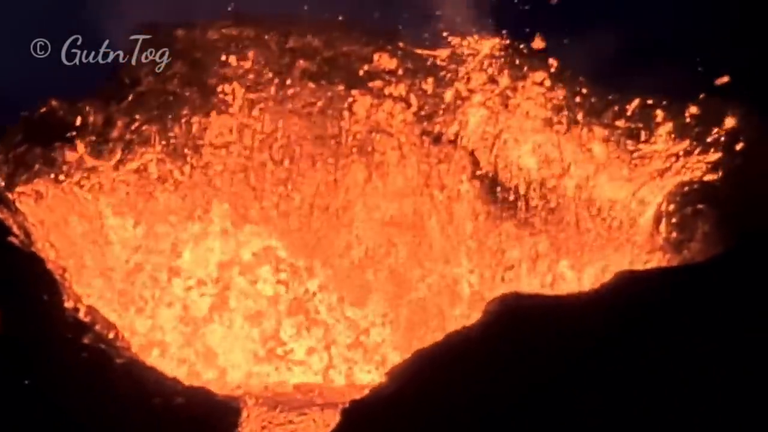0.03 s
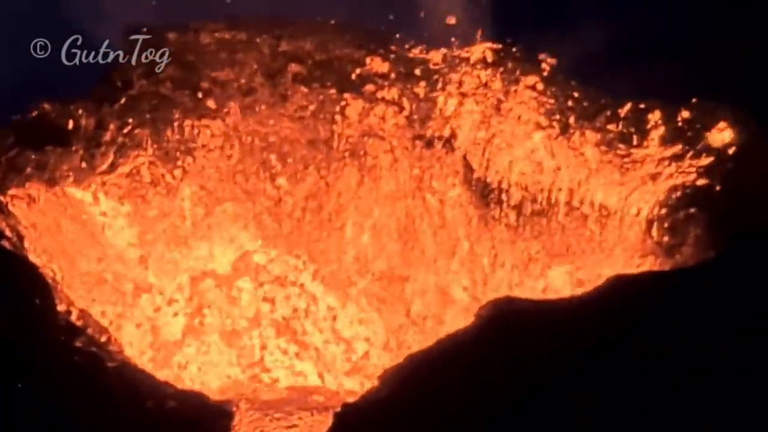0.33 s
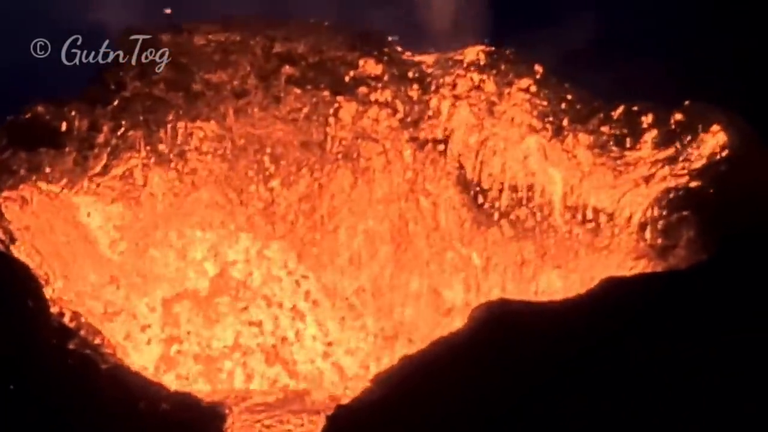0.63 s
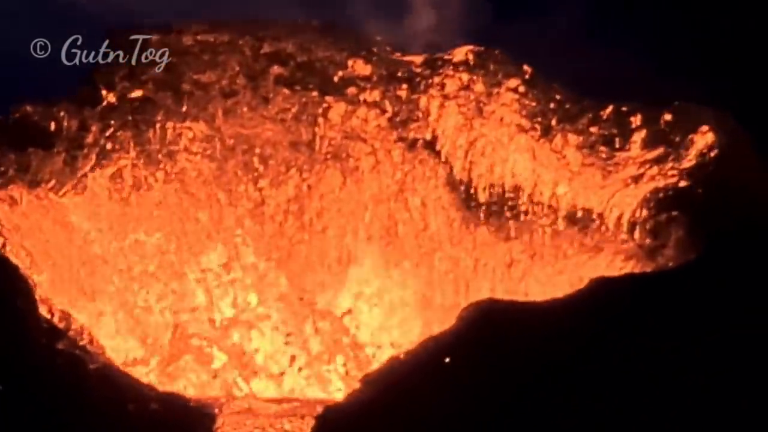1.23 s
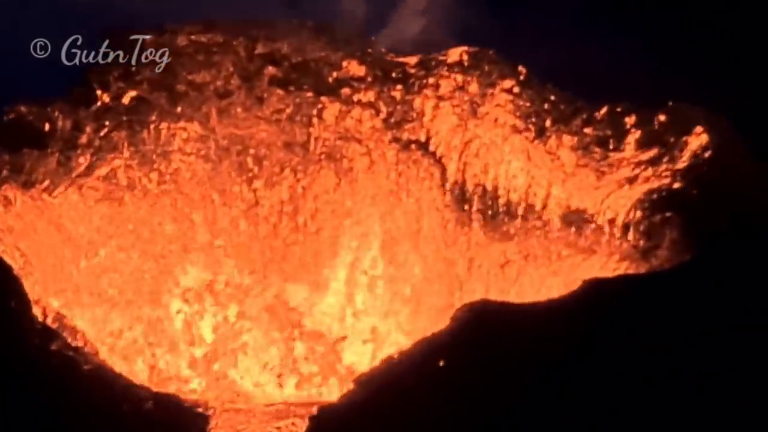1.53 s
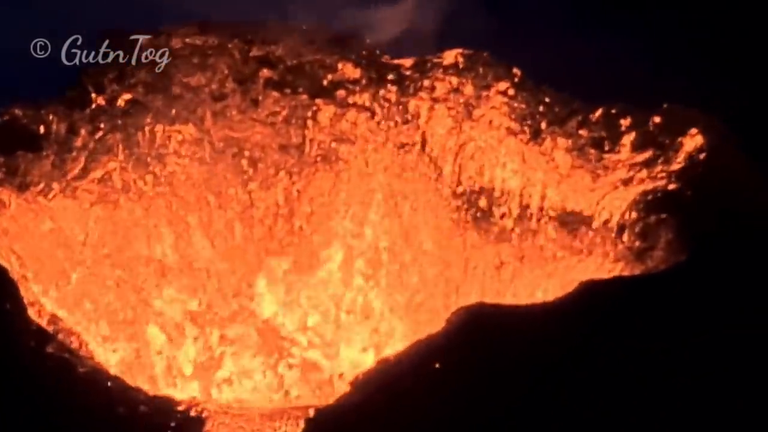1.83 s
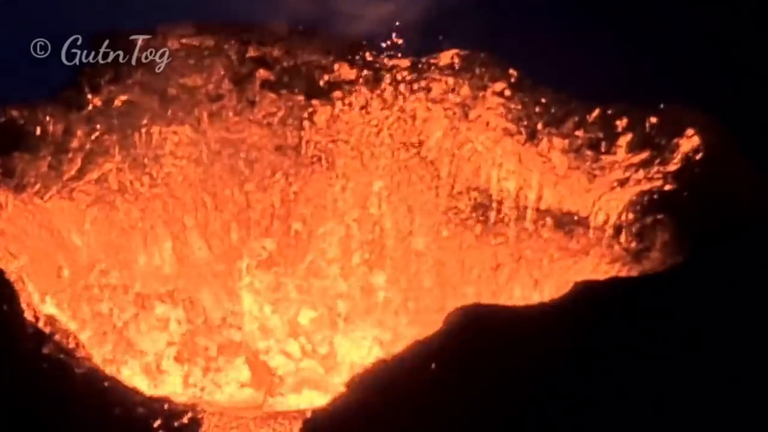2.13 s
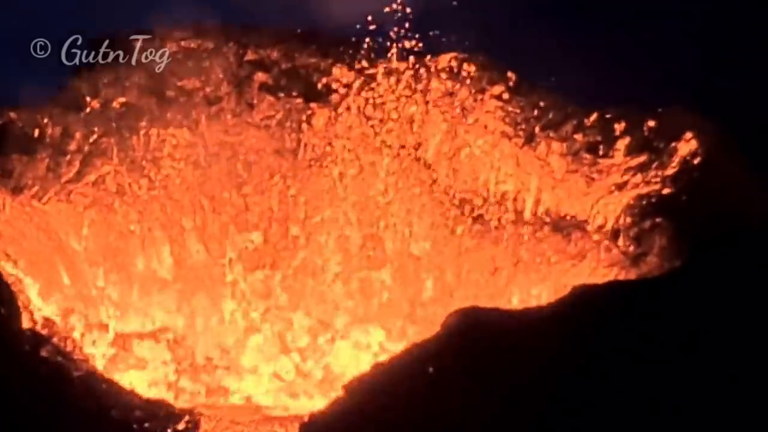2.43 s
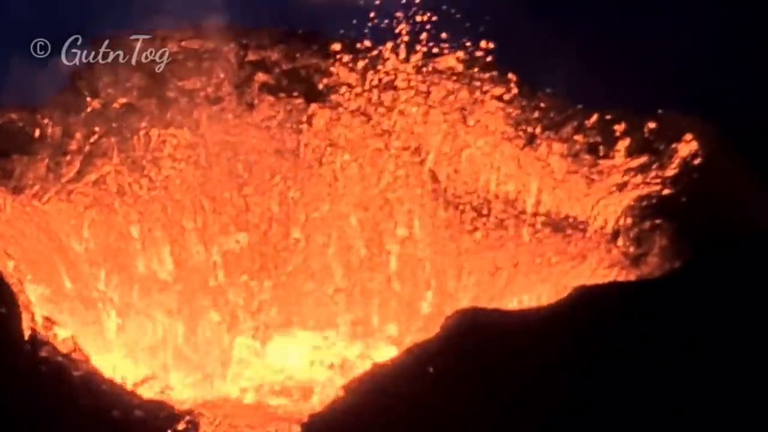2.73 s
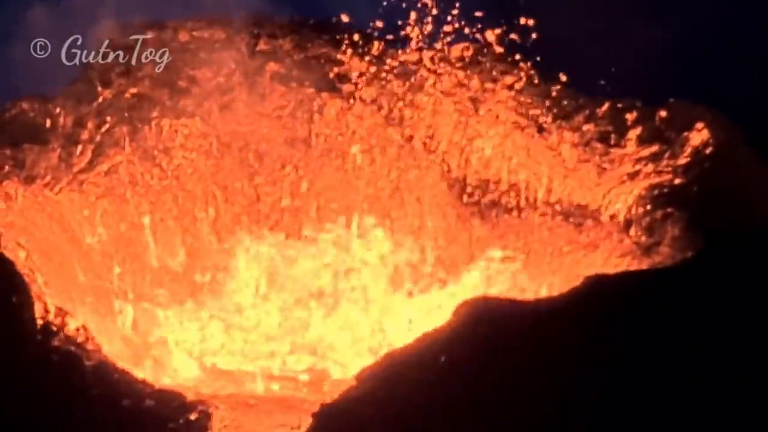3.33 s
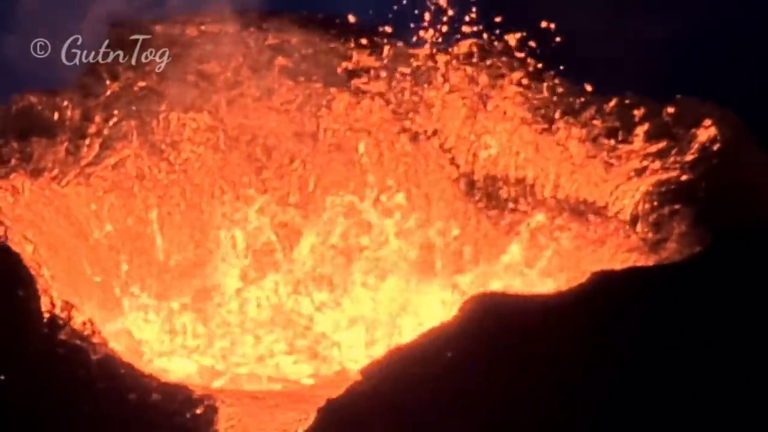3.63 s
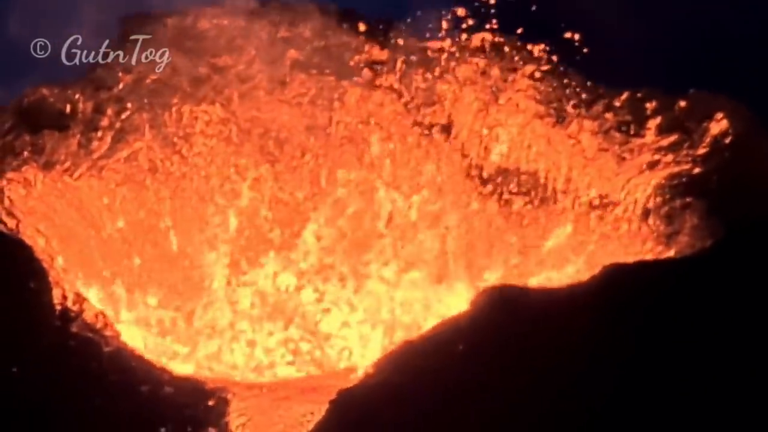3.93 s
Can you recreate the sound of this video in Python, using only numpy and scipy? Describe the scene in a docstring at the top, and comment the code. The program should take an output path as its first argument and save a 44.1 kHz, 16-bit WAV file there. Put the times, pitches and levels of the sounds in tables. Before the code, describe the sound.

Erupting lava rumbles and roars in a volcanic crater, with hissing spatter and wind buffets.

```python
"""At a volcanic crater, outdoors, with a two-port microphone set well back from a churning lava lake.
Gas bursting through the lava booms and rumbles, the fountains roar in surges, single bubbles slap open.
Off to the right, falling spatter hisses and crackles, with faint pips in the hiss.
Close up, wind buffets the ports, there are soft rustles, and twice something ticks on the microphone."""
import sys
import numpy as np
from scipy import signal
from scipy.fft import rfft, irfft
from scipy.io import wavfile
from scipy.ndimage import uniform_filter1d

SR = 44100
rng = np.random.default_rng(int(sys.argv[2]) if len(sys.argv) > 2 else 0)


def unload_audio(sound):
    """Save the sound as a 16-bit wav file, at the path given as the first command line argument."""
    columns = np.transpose(np.atleast_2d(sound))
    # keep every value between -1 and 1, then stretch to whole-number steps
    steps = np.round(np.clip(columns, -1, 1) * 32767)
    wavfile.write(sys.argv[1], SR, steps.astype(np.int16))


N = 176400

# How each distant layer rises and falls. Each row: time in seconds, relative level in dB.
SUB_LEVEL = [(0, -27.5), (.35, -33.5), (.8, -35), (1.2, -46), (1.55, -30.5), (2.2, -36.5), (2.52, -28.5),
             (2.8, -36), (3.03, -28), (3.45, -31.5), (3.88, -31.5), (4, -61)]
BOOM_LEVEL = [(0, -11.5), (.07, -36), (.22, -23), (.4, -38), (.6, -21), (.85, -27.5), (1.05, -35.5),
              (1.32, -18), (1.55, -44), (1.78, -21), (1.88, -30), (2.1, -26.5), (2.5, -27), (2.68, -41),
              (2.77, -16), (2.88, -27.5), (3.12, -33), (3.25, -36.5), (3.56, -22.5), (3.78, -48.5),
              (3.88, -28), (4, -24)]
RUMBLE_LEVEL = [(0.0, -33.5), (0.36, -20), (0.52, -43), (0.6, -30), (1.0, -33), (1.36, -22), (1.64, -30.5),
                (1.76, -34), (1.88, -26.5), (2.2, -27.5), (2.5, -24), (2.64, -35.5), (2.84, -26.5),
                (3.24, -29.5), (3.32, -36.5), (3.72, -37), (3.84, -29), (3.99, -42)]
CHURN_LEVEL = [(0.0, -28), (0.6, -25), (0.8, -32), (1.12, -26.5), (1.24, -34), (1.48, -28), (1.68, -31),
               (2.0, -28.5), (2.12, -32.5), (2.56, -24), (2.8, -26), (3.36, -28), (3.76, -25.5),
               (3.99, -33.5)]
ROAR_LEVEL = [(0.0, -29.5), (0.28, -31), (0.44, -28), (0.8, -30.5), (1.24, -30.5), (1.28, -26),
              (1.36, -31.5), (1.84, -30.5), (2.88, -25), (2.92, -28), (3.12, -26.5), (3.2, -29.5),
              (3.36, -28.5), (3.58, -30), (3.64, -25), (3.68, -29.5), (3.8, -28.5), (3.99, -31.5)]
HISS_LEVEL = [(0, -46.5), (.2, -48), (.55, -48), (.95, -54), (1.3, -51.5), (1.68, -52), (1.85, -55),
              (2.7, -58), (3.2, -60.5), (4, -58.5)]
FIZZ_LEVEL = [(0, -58), (.12, -57), (.28, -59.5), (.5, -59.5), (.8, -61), (1.5, -62.5), (2.5, -64.5),
              (3.4, -66), (4, -67)]
# Tone of each layer at the microphone. Each row: frequency in Hz, relative spectral density in dB.
SUB_SPECTRUM = [(12, -25), (22, -9), (33, -12.5), (44, 3), (54, -22), (70, -3.5), (120, -38)]
RUMBLE_SPECTRUM = [(55, -36.5), (85, -11), (100, 1), (115, -4), (135, 2), (160, 1), (180, -4), (230, -30.5)]
CHURN_SPECTRUM = [(130, -23.5), (170, -2), (195, 0), (225, -5), (262, -4), (300, -20.5), (350, -29.5),
                  (480, -48)]
ROAR_SPECTRUM = [(200, -21.5), (290, -3), (325, 0.5), (355, -8), (385, 1.5), (430, -1.5), (490, 2),
                 (580, -1), (720, -4.5), (920, -10.5), (1150, -14), (1400, -18), (1800, -29.5),
                 (2400, -40.5), (3500, -63.5)]
HISS_SPECTRUM = [(400, -14.5), (750, 1), (1100, 0.5), (1450, 3), (1800, -1.5), (2000, -4.5), (2500, -13),
                 (3000, -29), (4500, -42)]
FIZZ_SPECTRUM = [(1500, -14.5), (2400, 2.5), (3050, -0.5), (3450, -1.5), (3850, -4.5), (4800, -8),
                 (5600, -13.5), (7000, -26), (9000, -47.5)]
WIND_SPECTRUM = [(12, -24), (25, -4.5), (45, -5), (65, 3.5), (90, -1), (115, -9), (140, -18), (190, -23),
                 (300, -30), (600, -43), (1500, -81.5)]
RUSTLE_SPECTRUM = [(1200, -19), (2300, 5), (3400, -3), (4800, -10), (6500, -25.5), (12000, -43)]
MIC_HISS_SPECTRUM = [(3000, -6.5), (7300, -11), (8600, -3.5), (11500, 2), (15500, -1.5)]
# How alike the ports hear the crater ahead and the hiss at right. Each row: frequency in Hz, correlation.
CRATER_LIKENESS = [(30, .95), (130, .985), (250, .98), (600, .97), (1000, .9), (1600, .75), (4000, .3)]
HISS_LIKENESS = [(600, 0.29), (1700, 0.9), (2600, 0.56), (3500, 0.22), (5000, 0.092), (8000, .05)]
# Rustles close by. Each row: peak time in seconds, spread in seconds, level in dB.
RUSTLES = [(0.144, 0.045, -64), (0.357, 0.0075, -58), (0.719, 0.0074, -55.5), (0.939, 0.015, -58),
           (1.979, .022, -57.5)]
# Pips in the hiss. Each row: peak time and spread in seconds, pitch and width in Hz, level in dB.
PIPS = [(0.118, 0.029, 3460, 223, -60), (0.135, 0.0063, 2670, 250, -60), (.353, .005, 3150, 300, -57.5),
        (0.512, .012, 3430, 110, -63), (0.54, .015, 1820, 61, -49), (1.056, .008, 1900, 150, -44),
        (1.144, 0.0099, 1810, 70, -43), (1.242, 0.01, 1443, 30, -35.5), (1.318, .024, 1451, 55, -42),
        (1.376, 0.0038, 2260, 133, -45.5), (1.967, .012, 3450, 130, -61.5), (2.758, .011, 5040, 70, -72.5),
        (2.888, 0.006, 4160, 254, -68), (3.446, 0.019, 4250, 251, -71)]
# Ticks on the microphone. Each row: start in seconds, left and right strength in dB, ring offset in dB.
TICKS = [(0.9007, -26, -3, -16.5), (2.6468, -33, -13, -17)]
# The casing's resonances. Each row: frequency in Hz, relative level in dB, seconds to fall 60 dB.
CASING_MODES = [(1320, -4, 0.006), (1880, -15, 0.0088), (3150, -33, .012), (4740, -29, 0.035),
                (8200, -21.5, 0.0081), (8850, -34, .006), (12500, -37, .0015)]
# The casing's narrow dips in a tick's treble. Each row: frequency in Hz, Q.
CASING_DIPS = [(6300, 4.7), (10000, 13)]
# Wind buffets. Each row: peak time and nominal spread in seconds, left and right level in dB.
BUFFETS = [(0.53, 0.038, -11, -42), (0.6, 0.074, -24, -31), (1.436, 0.096, -35.5, -22.5),
           (1.768, 0.057, -26, -26), (2.753, .035, -18, -26), (3.07, 0.12, -36.5, -22.5),
           (3.599, 0.039, -30, -22.5), (3.698, 0.032, -27, -27), (3.858, 0.093, -27, -23.5)]
# Thuds that open sharp buffets at the left port. Each row: peak time and spread in seconds, level in dB.
THUDS = [(0.501, 0.0062, -9), (0.589, 0.016, -24.5)]
# Bubbles heard above the roar. Each row: start and decay in seconds, centre in Hz, relative level in dB.
BUBBLES = [(0.243, 0.0074, 747, -35), (0.868, 0.031, 600, -33), (1.894, 0.016, 533, -35),
           (2.118, 0.019, 560, -29.5), (2.544, 0.017, 134, -16), (2.774, .012, 490, -35),
           (2.933, 0.014, 550, -26.5), (3.021, .011, 497, -22.5), (3.128, 0.011, 480, -26.5),
           (3.642, 0.011, 565, -25), (3.784, 0.011, 580, -27)]

# Gains added to the level curves.
SUB_DB, BOOM_DB, RUMBLE_DB, CHURN_DB = 3.5, -2.5, -2, -4
ROAR_DB, HISS_DB, FIZZ_DB, CRACKLE_DB = -4, 6.5, -2.5, -9
HISS_LAG_S, ROAR_LAG_S = 0.00023, 0.00002  # how much later the left port is reached
PAN = np.array([[.5], [-.5]])  # splits a left-minus-right level between the ports


def from_db(db):
    """Decibels to gain."""
    return 10 ** (np.asarray(db) / 20)


def unit_rms(x):
    """Scale to unit rms."""
    return x / np.sqrt(np.mean(x ** 2) + 1e-20)


def in_time(rows):
    """A curve's value at every sample."""
    return np.interp(np.arange(N) / SR, *np.transpose(rows))


def bin_hz():
    """Frequency of every spectral bin, at least 1 Hz."""
    return np.maximum(np.arange(N // 2 + 1) * SR / N, 1)


def at_hz(points):
    """A table's value at every bin, joined on a log axis."""
    hz, value = np.transpose(points)
    return np.interp(np.log(bin_hz()), np.log(hz), value)


def colour(points):
    """Gain per bin, falling steeply beyond the table's ends."""
    hz = bin_hz()
    skirts = np.minimum(1, hz / points[0][0]) * np.minimum(1, points[-1][0] / hz)
    return from_db(at_hz(points)) * skirts ** 4


def resonance(hz, width_hz):
    """Gain per bin of a resonance applied twice."""
    f = bin_hz()
    return 1 / (1 + ((f * f - hz * hz) / (2 * f * width_hz) * np.sqrt(2)) ** 2)


def drift(rate_hz):
    """A random wander of unit rms, mostly slower than the given rate."""
    return unit_rms(irfft(rfft(rng.standard_normal(N)) / (1 + (bin_hz() / rate_hz) ** 2), N))


def swell(peak_s, spread_s):
    """A bell-shaped rise and fall."""
    return np.exp(-.5 * ((np.arange(N) / SR - peak_s) / spread_s) ** 2)


def ring(clicks, hz, t60):
    """A unit click sets a sine of height one ringing."""
    r, w = from_db(-60 / (t60 * SR)), 2 * np.pi * hz / SR
    return signal.lfilter([0, np.sin(w)], [1, -2 * r * np.cos(w), r * r], clicks + 1e-18)


def near_noise(gain):
    """Coloured noise, unrelated at the two ports."""
    return unit_rms(irfft(rfft(rng.standard_normal((2, N))) * gain, N))


def far_noise(gain, lag_s=0, likeness=CRATER_LIKENESS):
    """Coloured noise from a distance, partly alike at the two ports, the left one later by the lag."""
    mid, side = rfft(rng.standard_normal((2, N))) * gain
    alike = np.clip(at_hz(likeness), -1, 1)
    ports = np.sqrt(1 + alike) * mid + np.sqrt(1 - alike) * side * np.array([[1], [-1]])
    ports[0] *= np.exp(-2j * np.pi * bin_hz() * lag_s)
    return unit_rms(irfft(ports, N))


def steady(x, window_s):
    """Even out a noise's slow swings so that its level follows its own control."""
    window = window_s * SR
    power = uniform_filter1d(np.mean(x ** 2, axis=0), int(window), mode="wrap")
    power = uniform_filter1d(power, int(window / 2), mode="wrap")
    return unit_rms(x / np.sqrt(power + 1e-9))


def rustles():
    """Brief soft rustles close to the microphone."""
    envelope = sum(from_db(db) * swell(s, spread) for s, spread, db in RUSTLES)
    return envelope * near_noise(colour(RUSTLE_SPECTRUM))


def pips():
    """Short, faint whistles of narrow-band noise off to the right."""
    out = 0
    for s, spread, hz, width, db in PIPS:
        whistle = far_noise(resonance(hz, width), HISS_LAG_S, HISS_LIKENESS)
        out += from_db(db) * swell(s, spread) * steady(whistle, window_s=0.027)
    return out


def ticks():
    """Each tick on the microphone is a heavily damped knock that sets the casing ringing."""
    knocks, strikes = np.zeros((2, 2, N))
    for s, left, right, ring_db in TICKS:
        knocks[:, int(s * SR)] = -from_db([left, right])
        strikes[:, int(s * SR)] = -from_db([left + ring_db, right + ring_db])
    casing = sum(from_db(db) * ring(strikes, hz, t60) for hz, db, t60 in CASING_MODES)
    out = ring(knocks, hz=392, t60=0.0038) + casing
    for hz, q in CASING_DIPS:
        out = signal.lfilter(*signal.iirnotch(hz, q, fs=SR), out)
    return out


def wind(breeze_db=-34.5):
    """Lumpy turbulence right on the microphone, its own at each port, with stronger buffets and thuds."""
    tone = colour(WIND_SPECTRUM)
    breeze = from_db(breeze_db) * near_noise(tone)
    push = sum(from_db([[left], [right]]) * swell(s, spread) ** 2 for s, spread, left, right in BUFFETS)
    eddies = np.vstack([steady(port[None], window_s=0.055) for port in near_noise(tone)])
    knock = steady(near_noise(resonance(hz=125, width_hz=24))[:1], window_s=0.041)
    thuds = sum(from_db(db) * swell(s, spread) for s, spread, db in THUDS) * knock
    return breeze + push * eddies + np.vstack([thuds, np.zeros(N)])


def crackle(per_s=430, low_hz=1600, high_hz=4800, pitches=16, spread_db=4.5, octave_db=-5, cut_hz=4500):
    """Small impacts, dulled by distance, each ring briefly in the hiss; higher ones are weaker."""
    sizes = from_db(spread_db * np.minimum(rng.exponential(1, N), 2)) * rng.uniform(-1.3, 1, (2, N))
    impacts = sizes * (rng.random(N) < per_s / SR)
    pitch_index = rng.integers(0, pitches, N)
    rings = 0
    for k, hz in enumerate(np.geomspace(low_hz, high_hz, pitches)):
        gain = from_db(octave_db * np.log2(hz / low_hz))
        rings += gain * ring(impacts * (pitch_index == k), hz, t60=32 / hz)
    dulled = signal.sosfilt(signal.butter(6, cut_hz, fs=SR, output="sos"), rings)
    return from_db(CRACKLE_DB + in_time(FIZZ_LEVEL)) * unit_rms(dulled)


def spatter(patter_db=2.5, grain_db=1.1, pan_db=-1.0):
    """Falling clots and sliding rubble far to the right, blurred to a pattering hiss and a finer fizz."""
    hiss_db = HISS_DB + in_time(HISS_LEVEL) + patter_db * drift(rate_hz=30) + PAN * pan_db
    hiss = from_db(hiss_db) * far_noise(colour(HISS_SPECTRUM), HISS_LAG_S, HISS_LIKENESS)
    fizz_db = FIZZ_DB + in_time(FIZZ_LEVEL) + grain_db * drift(rate_hz=78)
    fizz = from_db(fizz_db) * far_noise(colour(FIZZ_SPECTRUM), HISS_LAG_S, HISS_LIKENESS)
    return hiss + fizz


def bubbles(attack_s=0.002, q=2.2, cut_hz=1200):
    """Single bubbles of gas break open with a slap that dies away quickly, dulled by distance."""
    slaps = 0
    for s, decay_s, hz, db in BUBBLES:
        age = np.maximum(np.arange(N) / SR - s, 0)
        envelope = (1 - np.exp(-age / attack_s)) * np.exp(-np.maximum(age - attack_s, 0) / decay_s)
        gas = steady(far_noise(resonance(hz, hz / q), ROAR_LAG_S), window_s=0.01)
        slaps += from_db(db) * envelope * gas
    return signal.sosfilt(signal.butter(4, cut_hz, fs=SR, output="sos"), slaps)


def fountains(puffs_per_s=63, puff_decay_s=0.0059, puff_depth=0.21, flutter_db=0.5, pan_db=-1.84):
    """The distant roar of gas and lava thrown upward, roughened by sudden short puffs."""
    starts = (rng.random(N) < puffs_per_s / SR) * rng.random(N) * 2
    puffs = signal.lfilter([1], [1, -np.exp(-1 / (puff_decay_s * SR))], starts + 1e-18)
    attack = int(0.002 * SR)
    puffs = uniform_filter1d(uniform_filter1d(puffs, attack), attack)
    roar = far_noise(colour(ROAR_SPECTRUM), ROAR_LAG_S) * (1 + puff_depth * puffs)
    level_db = ROAR_DB + in_time(ROAR_LEVEL) - flutter_db * drift(rate_hz=25) + PAN * pan_db
    return from_db(level_db) * steady(roar, window_s=0.48)


def lava_lake():
    """Gas bursting far ahead: a sub-bass heave, the boom of the bowl, a rumble and churning above it."""
    sub = steady(far_noise(colour(SUB_SPECTRUM)), window_s=0.42)
    boom = steady(far_noise(resonance(hz=68, width_hz=15)), window_s=0.1)
    rumble = steady(far_noise(colour(RUMBLE_SPECTRUM)), window_s=0.17)
    churn = steady(far_noise(colour(CHURN_SPECTRUM)), window_s=0.21)
    return (from_db(SUB_DB + in_time(SUB_LEVEL)) * sub
            + from_db(BOOM_DB + in_time(BOOM_LEVEL)) * boom
            + from_db(RUMBLE_DB + in_time(RUMBLE_LEVEL)) * rumble
            + from_db(CHURN_DB + in_time(CHURN_LEVEL)) * churn)


def scene():
    """The eruption in the distance, the wind and the small sounds at the microphone."""
    return (lava_lake() + fountains() + spatter() + crackle()
            + wind() + pips() + rustles() + ticks() + bubbles())


def record(dry, hiss_db=-74, cut_hz=15500):
    """The microphone adds its own faint hiss; the top is cut steeply."""
    noisy = dry + from_db(hiss_db) * near_noise(colour(MIC_HISS_SPECTRUM))
    return signal.sosfilt(signal.ellip(12, .1, 80, cut_hz, fs=SR, output="sos"), noisy)


dry = scene()
out = record(dry)
unload_audio(out)
```